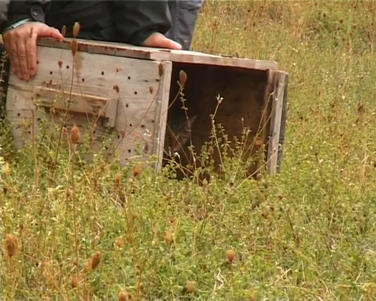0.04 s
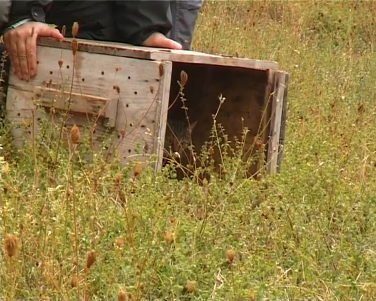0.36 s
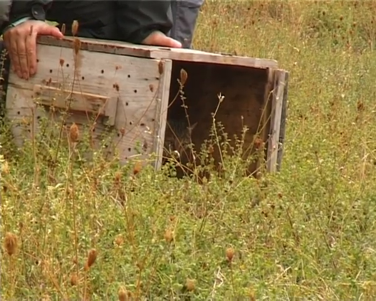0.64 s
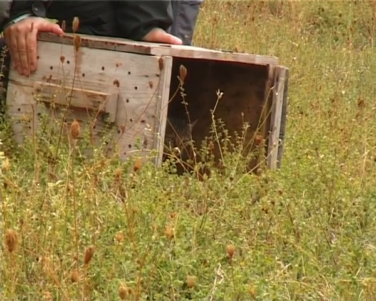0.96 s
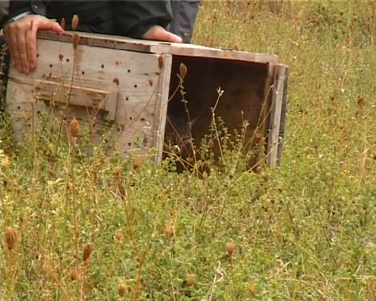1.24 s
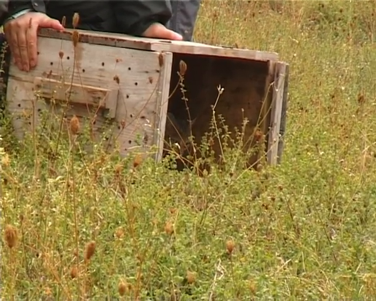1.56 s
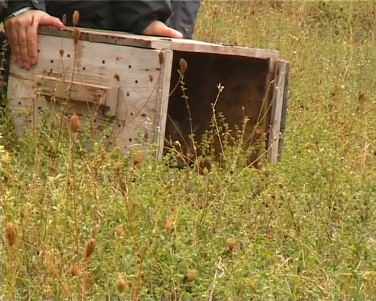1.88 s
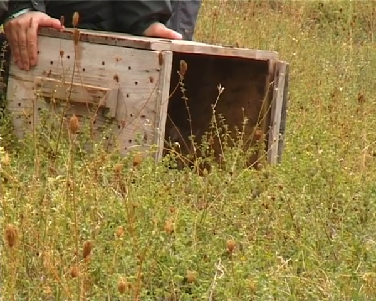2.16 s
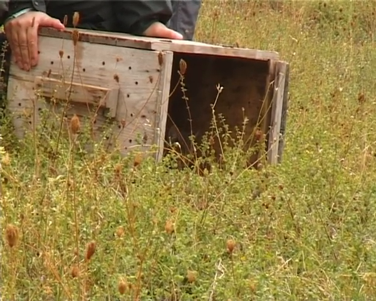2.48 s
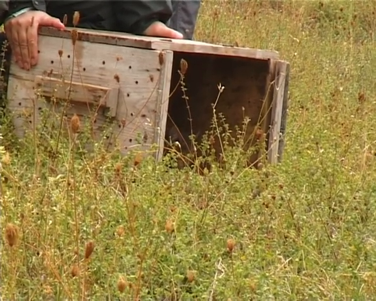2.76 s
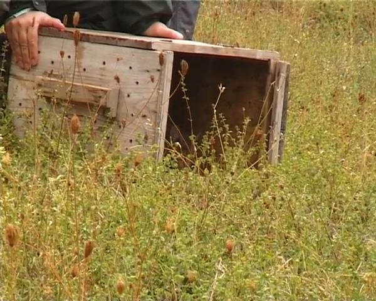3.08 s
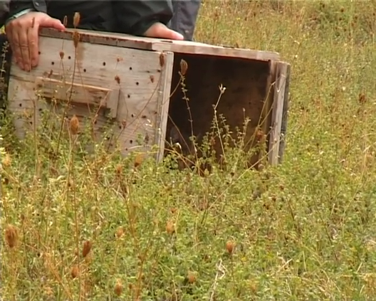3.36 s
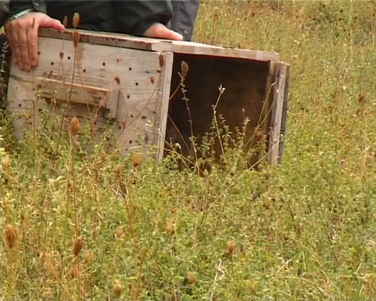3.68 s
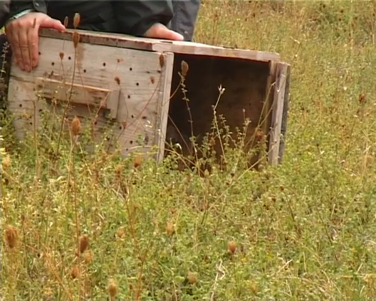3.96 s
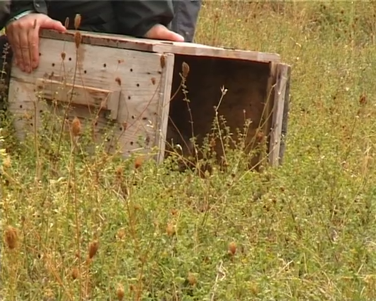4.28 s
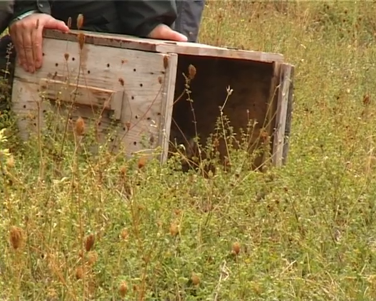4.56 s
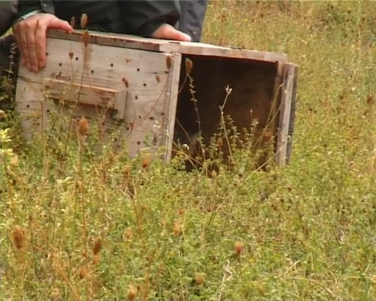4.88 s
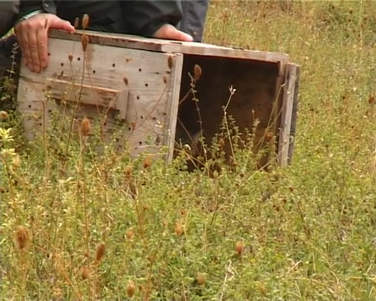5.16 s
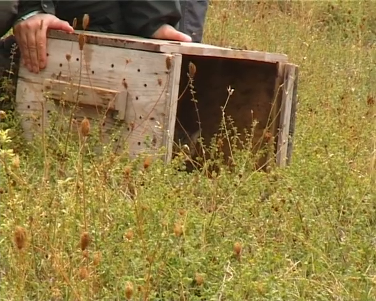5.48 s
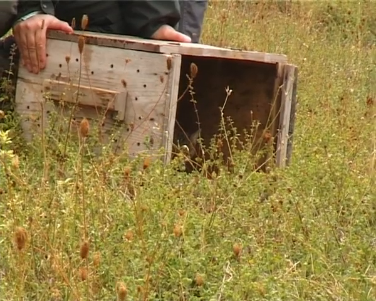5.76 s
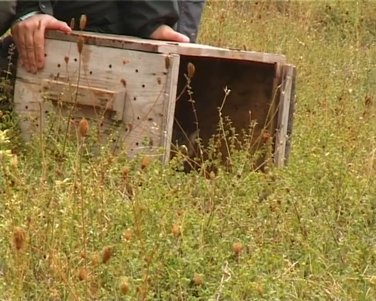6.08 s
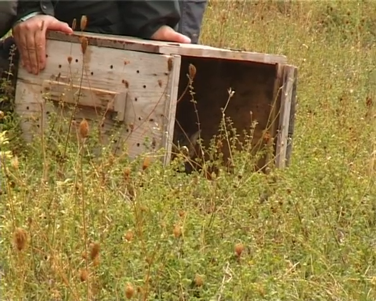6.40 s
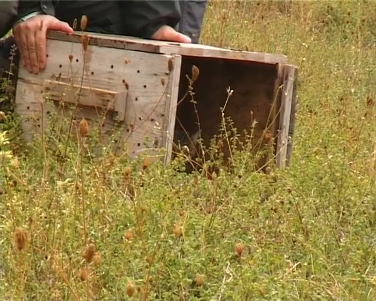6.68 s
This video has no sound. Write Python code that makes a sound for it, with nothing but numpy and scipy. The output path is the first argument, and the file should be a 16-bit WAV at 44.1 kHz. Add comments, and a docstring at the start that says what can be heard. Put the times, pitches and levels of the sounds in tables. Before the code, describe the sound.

A small songbird sings two phrases of high whistles in an open meadow, as wind buffets the microphone and a wooden box knocks once.

```python
"""Open country washes in the distance, a camera's motor hums and a dry stalk ticks. A small songbird sings
a phrase, alternating a rising note and an arched, falling whistle; the field answers faintly and eddies
thump softly on the microphone. A weaker song trails the phrase. A wooden box taps lightly, then gusts
build under the second phrase, and midway through it the box gives one clear, rattling knock."""
import sys
import numpy as np
from scipy import signal
from scipy.fft import rfft, irfft, next_fast_len
from scipy.io import wavfile
from scipy.ndimage import uniform_filter1d, map_coordinates

SR = 44100
rng = np.random.default_rng(int(sys.argv[2]) if len(sys.argv) > 2 else 0)


def wrap_up_sound(samples):
    """Save the sound to the file named by the first command line argument, as 16-bit audio."""
    columns = np.atleast_2d(samples).T
    # keep every value between -1 and 1, then stretch to whole-number steps
    tamed = np.clip(columns, -1, 1)
    steps = np.round(tamed * 32767).astype(np.int16)
    wavfile.write(sys.argv[1], SR, steps)


N = 296793
TIME = np.arange(N) / SR


def amp(db):
    """Decibels to gain."""
    return 10 ** (np.asarray(db) / 20)


def unit(x):
    """x at rms 1."""
    return x / np.sqrt(np.mean(x ** 2) + 1e-20)


def along(points, hz):
    """Read a curve of (frequency [Hz], value) points on a log frequency axis."""
    freqs, values = np.transpose(points)
    return np.interp(np.log(hz + 1), np.log(freqs + 1), values)


def wobble(rate):
    """A smooth random modulator, rate knots a second."""
    return map_coordinates(rng.standard_normal(int(N * rate / SR) + 4), [TIME * rate])


def filtered(x, response):
    """x through a complex frequency response."""
    size = next_fast_len(N + SR // 2)
    return irfft(rfft(x, size) * response(np.fft.rfftfreq(size, 1 / SR)), size)[..., :N]


def pan(db):
    """Left and right gains, the left louder by db."""
    return amp([[db / 2], [-db / 2]])


def add(track, start, sound):
    """Mix a sound into a track at start seconds."""
    part = track[round(start * SR):][:len(sound)]
    part += sound[:len(part)]


def rush(spectrum, correlation, patchy_db):
    """Stereo noise of rms 1 with patches of random gain, shaped by EQ and left-right correlation curves."""
    def mid_side(hz):
        width = np.arccos(np.clip(along(correlation, hz), -1, 1)) / 2
        return amp(along(spectrum, hz)) * [np.cos(width), np.sin(width)]

    bins = signal.stft(rng.standard_normal((2, N)), nperseg=512)[2]
    patches = uniform_filter1d(rng.standard_normal(bins.shape[1:]), size=6, axis=0)
    patches = uniform_filter1d(patches, size=14, axis=1)
    noise = signal.istft(bins * amp(patchy_db * unit(patches)), nperseg=512)[1][:, :N]
    mid, side = filtered(noise, mid_side)
    return unit(np.array([mid + side, mid - side]))


def open_country(wash_db=-47.5, rumble_db=-44):
    """An even bed of far-off country noise over a light rumble."""
    # EQ of the wash and of the rumble: (frequency [Hz], level [dB])
    wash_eq = [(150, -27), (250, -5), (292, -3), (324, -4.5), (366, -2.5), (708, -2.5), (828, -5),
               (984, -0.5), (1070, -3), (1440, -4.5), (4860, -16), (9550, -18.5), (15000, -28.5),
               (15800, -40)]
    rumble_eq = [(10, -12), (25, -2), (50, 0), (85, -6), (130, -10), (180, -14), (260, -19), (500, -50)]
    # stereo image of the wash: (frequency [Hz], left-right correlation [0-1])
    wash_image = [(250, 0.44), (640, 0.78), (1400, 0.53), (3100, 0.34), (7000, 0), (15000, 0.19)]
    wash = amp(wash_db) * rush(wash_eq, wash_image, patchy_db=.6)
    rumble = amp(rumble_db + wobble(20)) * rush(rumble_eq, [(60, 0.8), (200, 0.04)], patchy_db=-1)
    return wash * pan(-.4) + rumble * pan(1)


def motor_hum():
    """The camera's motor hum and thin whistle: sines that swell and sink, close ones beating."""
    # partials: (frequency [Hz], level [dB], left over right [dB], sway [dB])
    partials = [(49.8, -49, 2.5, 2.5), (96.2, -55, 4.5, 1.5), (99.7, -42.3, 4.5, .9), (150, -61, 1, 3),
                (196, -62, 1, 3), (200, -61, 1, 3), (299, -68, 1, 3), (1000, -68, -2, 3), (2100, -72, 0, 3),
                (15625, -70, 1, .5)]
    out = np.zeros((2, N))
    for hz, db, pan_db, sway_db in partials:
        level = amp(db + sway_db * wobble(7))
        phase = 2 * np.pi * (hz * TIME + rng.random()) + 0.041 * wobble(2.9)
        out += pan(pan_db) * level * np.sin(phase)
    return out


def dry_stalks():
    """Stalks snap and scrape: each a dying noise burst through one resonance."""
    # snaps: (time [s], peak [dB], t60 [s], centre [Hz], resonance [Q])
    ticks = [(.502, -42, .004, 6000, 1), (2.298, -32, .09, 1750, 6), (4.851, -25, .004, 1400, 1.3),
             (5.855, -27, .004, 1400, 3)]
    out, t = np.zeros(N), np.arange(SR // 10) / SR
    for start, db, t60, hz, q in ticks:
        burst = rng.standard_normal(len(t)) * amp(-60 * t / t60)
        snap = signal.lfilter(*signal.iirpeak(hz, q, fs=SR), burst)
        add(out, start, amp(db) * snap / np.abs(snap).max())
    return out


def rising_pitch(t, leap_at, overshoot_hz, low_hz=2910, high_hz=4565):
    """The note scoops up to a low register, leaps to a high one and ends in an upward flick."""
    scoop = 1051 * np.exp(-t / .005)
    leap = (high_hz - low_hz) / (1 + np.exp((leap_at - t) / .0039))
    overshoot = overshoot_hz * np.exp(-((t - leap_at - .013) / .008) ** 2)  # a hard leap goes briefly sharp
    flick = 1303 * np.exp((t - t[-1]) / .017)
    return low_hz - scoop + leap + overshoot + flick


def arched_pitch(t, knee_at, onset_hz=6520, top_hz=8880, knee_hz=6550, held_hz=4330):
    """A quick climb, a rounded fall to the knee, then an ever slower glide to the held pitch."""
    climb_share, top_share = .235, .31  # of the time to the knee
    below_top = (top_hz - onset_hz) / (1 + np.exp((t - climb_share * knee_at) / .0026))
    fall = (top_hz - knee_hz) * np.clip((t / knee_at - top_share) / (1 - top_share), 0, 1) ** 1.8
    settling = held_hz + (knee_hz - held_hz) * np.exp((knee_at - t) / .0142)
    return np.where(t < knee_at, top_hz - below_top - fall, settling)


def throat(glide, notes, attack_s=.0048, release_s=.0099, full_effort_db=-12.5, easy_db=-18.5):
    """Pitch and level envelopes of a run of notes, loudest in the middle of the bird's range."""
    # throat response: (pitch [Hz], gain [dB])
    response = [(2000, -21.5), (2700, -21), (3060, -11.5), (3500, -10.5), (4000, -2), (4650, -0.5),
                (5900, -3.5), (6900, -2.5), (7700, -6.5), (8800, -21)]
    pitch, level = np.zeros((2, N))
    for start, bend, end, db, fade_db, shift_hz, *manner in notes:
        t = np.arange(0, end - start, 1 / SR)
        hz = glide(t, bend - start, *manner)
        attack = np.sin(np.pi / 2 * np.minimum(t / attack_s, 1))
        release = np.sin(np.pi / 2 * np.minimum((t[-1] - t) / release_s, 1)) ** 2
        # softer notes lose their top, the softest also their low scoop
        top_db = np.clip(1.01 * (db - full_effort_db), -6, 0) * np.interp(hz, [5500, 6800], [0, 1])
        low_db = np.clip(3.3 * (db - easy_db), -7, 0) * np.interp(hz, [3500, 4400], [1, 0])
        contour_db = db + along(response, hz) + top_db + low_db - fade_db * t / t[-1]
        add(pitch, start, hz + shift_hz)
        add(level, start, attack * release * amp(contour_db))
    return pitch, level


def whistle(glide, notes, waver_hz=20, side_hz=3960, flutter_db=.7, left_lag_s=.000103):
    """A nearly pure, trembling tone with a weak octave, a faint side tone above it and a little rasp."""
    # second harmonic and side tone, relative to the main tone: (pitch [Hz], level [dB])
    octave_levels = [(2000, 19.5), (2500, 0), (2900, -18), (3600, -27), (4400, -45.5), (6000, -37),
                     (8000, -46)]
    side_levels = [(6500, -42), (8700, -22)]
    # rasp, least in mid-range: (pitch [Hz], roughness [0-1])
    roughness = [(2500, 0.29), (4000, 0.07), (4400, .02), (4700, .04), (5600, .12), (8500, 0.18)]
    out = np.zeros((2, N))
    lead = left_lag_s / 2 * np.array([[-1], [1]])
    for alternate_notes in (notes[::2], notes[1::2]):  # neighbouring notes may overlap
        pitch, level = throat(glide, alternate_notes)
        rasp = along(roughness, pitch)
        wavering = pitch + waver_hz * wobble(250) + 12 * wobble(45)
        phase = 2 * np.pi * (np.cumsum(wavering) / SR + pitch * lead)
        tone = np.sin(phase) * (1 + rasp * wobble(3400)) + rasp * wobble(3400) * np.cos(phase)
        octave = amp(along(octave_levels, pitch)) * np.sin(2 * phase)
        side = amp(along(side_levels, pitch)) * np.sin(phase + 2 * np.pi * side_hz * TIME)
        flutter = amp(flutter_db * wobble(130))
        out += np.sqrt(2) * level * flutter * (tone + octave + side)
    return out


def songbird(hiss_db=-27, left_db=4.2):
    """Two phrases and a weak trailing song, left of centre, with echoes and a soft hiss on every note."""
    # rising notes: (start [s], leap [s], end [s], level [dB], fade [dB], detune [Hz], overshoot [Hz])
    rises = [(.701, .728, .795, -21, 0, 0, 0), (1.094, 1.123, 1.200, -15.5, 0, 0, 0),
             (1.507, 1.534, 1.612, -14, 2, 0, 190), (1.916, 1.945, 2.025, -14.5, 0, 20, 170),
             (2.348, 2.376, 2.449, -14.7, 25, -20, 50), (2.395, 2.424, 2.502, -42, -7, -40, 0),
             (4.718, 4.744, 4.812, -20.5, 0, 0, 0), (5.112, 5.139, 5.217, -18.5, 0, -20, 0),
             (5.517, 5.545, 5.622, -17.5, 0, -10, 80), (5.916, 5.947, 6.025, -17.5, 0, -20, 80)]
    # arched whistles: (start [s], knee [s], end [s], level [dB], fade [dB], detune [Hz])
    arches = [(.858, .909, 1.024, -18, 0, 30), (1.265, 1.316, 1.435, -15, 1, 20),
              (1.675, 1.729, 1.841, -14.5, 0, 0), (2.087, 2.143, 2.249, -14.5, 1.5, 50),
              (2.518, 2.576, 2.685, -48, 3, 0), (4.879, 4.929, 5.042, -20, 0, 50),
              (5.282, 5.333, 5.447, -17.5, 0, 0), (5.686, 5.737, 5.843, -17.5, 0, -10),
              (6.086, 6.140, 6.251, -18, 1, 0)]
    # soft slur: (start [s], dip [s], end [s], level [dB], fade [dB], detune [Hz])
    slurs = [(2.503, 2.545, 2.577, -32, -2, 0)]
    # EQ of the hiss: (frequency [Hz], level [dB])
    hiss_eq = [(200, -3.5), (500, 0), (1400, 6), (2400, 1.5), (4500, -6), (7000, -4.5), (11000, -9),
               (16000, -32)]
    voice = whistle(rising_pitch, rises) + whistle(arched_pitch, arches) + whistle(slurred_pitch, slurs)
    effort = np.sqrt(np.abs(uniform_filter1d(voice[0] ** 2, size=300)))
    air = rush(hiss_eq, [(1500, 0.72), (3000, 0.71), (5000, -0.12), (9000, -0.62)], patchy_db=4)
    return (voice + meadow(voice) + amp(hiss_db) * effort * air) * pan(left_db)


def meadow(voice, scatter_db=-32, t60=0.31):
    """The field's answer: two weak echoes and a thin scatter from grass and bushes."""
    # reflections from things around the field: (delay [s], level [dB])
    taps = [(.040, -30), (.116, -39)]
    # their EQ: (frequency [Hz], gain [dB])
    echo_eq = [(2500, -18), (3900, -6), (4350, 0), (4700, -8), (5300, -15), (8000, -18)]

    def reflections(hz):
        delays = sum(amp(db) * np.exp(-2j * np.pi * hz * delay) for delay, db in taps)
        return amp(along(echo_eq, hz)) * delays

    t = np.arange(SR // 2) / SR
    tail = rng.standard_normal((2, len(t))) * amp(-60 * t / t60)
    tail *= amp(scatter_db) / np.linalg.norm(tail[0])
    return filtered(voice, reflections) + signal.fftconvolve(voice, tail, axes=1)[:, :N]


def wind_eddies(trim_db=-0.7, full_level_hz=198.6, db_per_octave=31):
    """Each eddy thumps the microphone once; a stronger one passes faster and sounds higher."""
    # thumps: (time [s], level [dB])
    thumps = [(0.986, -31), (1.745, -28.5), (2.206, -29), (3.184, -29), (4.012, -30.5), (4.434, -26),
              (4.751, -12.5), (4.904, -22.5), (4.952, -13), (5.005, -20), (5.276, -18), (5.616, -15.5),
              (5.855, -12.5), (5.88, -8), (5.948, -8), (6.121, -13), (6.444, -16)]
    out, t = np.zeros(N), np.arange(SR // 10) / SR
    for centre, db in thumps:
        hz = full_level_hz * 2 ** (db / db_per_octave)
        spread = (np.pi * hz * (t - t.mean())) ** 2
        pressure = (2 * spread - 1) * np.exp(-spread)  # a dip between two small rises
        add(out, centre - t.mean(), amp(db + trim_db) * pressure)
    return out * pan(1)


def slurred_pitch(t, dip_at, dip_hz=2570, hz_per_s=24000):
    """The soft slur after the first phrase slides down and up again at an even speed."""
    return dip_hz + hz_per_s * np.abs(t - dip_at)


def wooden_box():
    """The box taps and rattles; each hit rings its modes in a slightly different balance."""
    # hits: (time [s], peak [dB])
    knocks = [(3.936, -34), (4.024, -33), (4.33, -35), (5.363, -31), (5.378, -28), (5.381, -17.5),
              (5.3933, -20), (5.397, -27), (5.400, -28), (5.855, -33)]
    # modes of the wood: (frequency [Hz], level [dB], t60 [s])
    modes = [(725, -4, 0.04), (842, 14, 0.025), (1094, 8, 0.03), (1670, -10, 0.034), (2480, -8, .012)]
    out, t = np.zeros(N), np.arange(SR // 10) / SR
    for start, db in knocks:
        ring = sum(amp(mode_db + 2 * rng.standard_normal() - 60 * t / t60) * np.sin(2 * np.pi * hz * t)
                   for hz, mode_db, t60 in modes)
        add(out, start, amp(db) * ring / np.abs(ring).max())
    return out


def wind_gusts(trim_db=-2, lumps_db=3):
    """Late gusts buffet the microphone with low, lumpy noise."""
    # gust envelope: (time [s], level [dB])
    envelope = [(4.36, -54), (4.42, -41), (4.65, -50), (4.76, -21), (4.78, -36.5), (4.97, -31),
                (5.14, -32.5), (5.28, -31), (5.46, -50.5), (5.63, -22), (5.8, -34), (5.86, -17.5),
                (6.04, -20), (6.07, -32), (6.12, -20.5), (6.3, -27), (6.42, -27), (6.73, -47.5)]
    # EQ of the buffeting: (frequency [Hz], level [dB])
    buffet_eq = [(10, -17), (25, 4), (60, 6), (100, 1.5), (140, 1), (210, -1.5), (260, -8.5), (375, -13.5),
                 (640, -25.5), (1200, -60)]
    times, db = np.transpose(envelope)
    level = amp(np.interp(TIME, times, db + trim_db, left=-90))
    lumps = amp(lumps_db * wobble(45))
    buffet = rush(buffet_eq, [(30, 1.0), (130, 0.83), (290, 0.77), (640, 0.65)], patchy_db=0)
    return level * unit(lumps * buffet) * pan(1)


def scene():
    """The stereo mix at the microphone."""
    return songbird() + wind_gusts() + wind_eddies() + wooden_box() + dry_stalks() + motor_hum() + open_country()


def record(dry, top_hz=15900):
    """The camera keeps nothing above its band limit."""
    return filtered(dry, lambda hz: hz < top_hz)


dry = scene()
out = record(dry)
wrap_up_sound(out)
```